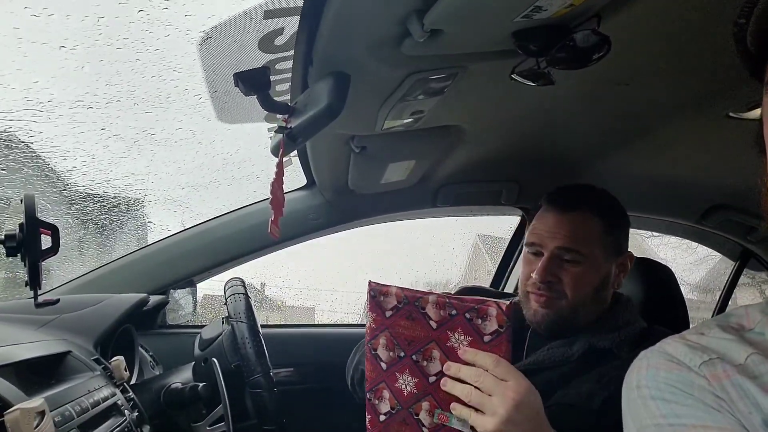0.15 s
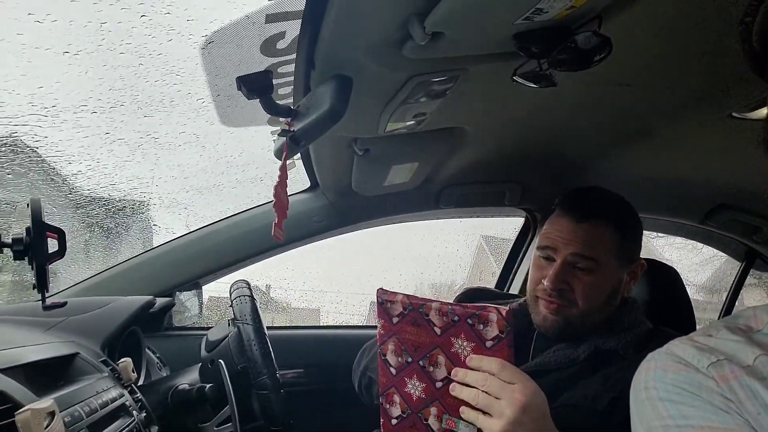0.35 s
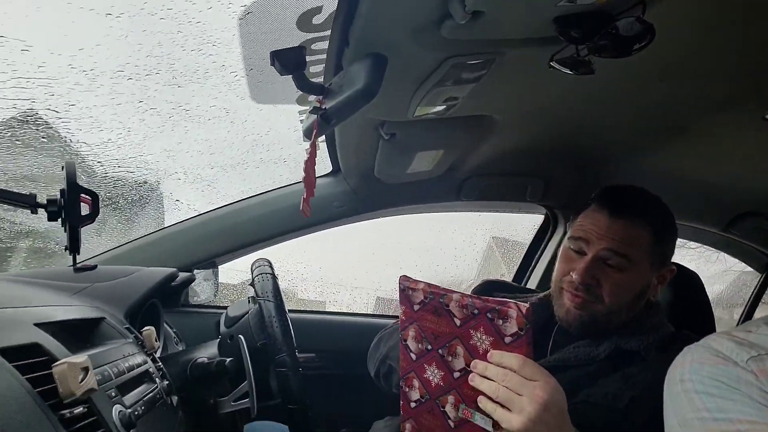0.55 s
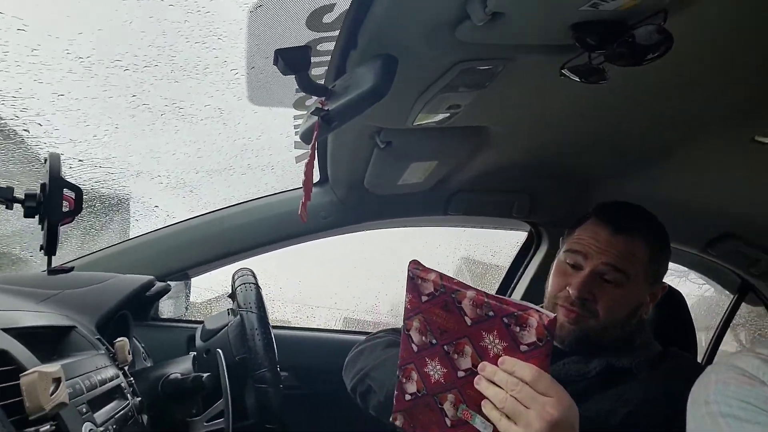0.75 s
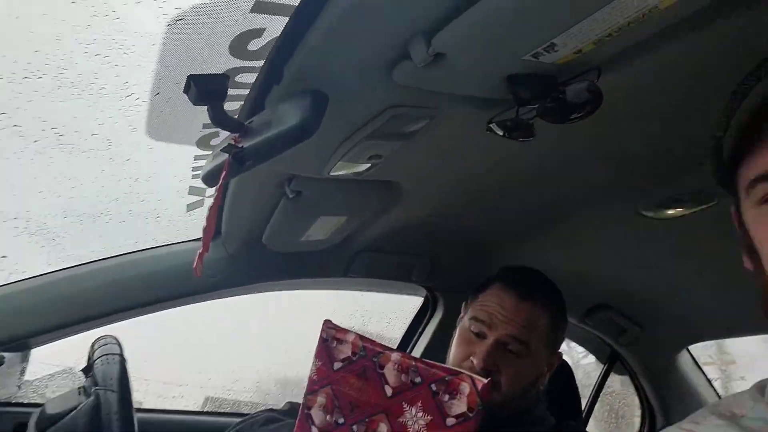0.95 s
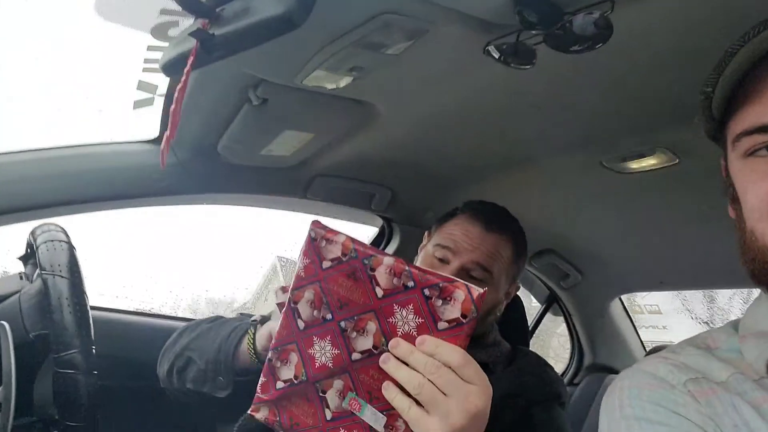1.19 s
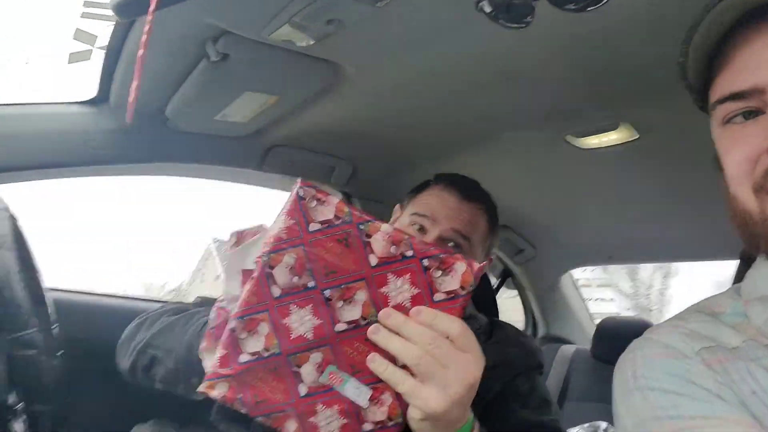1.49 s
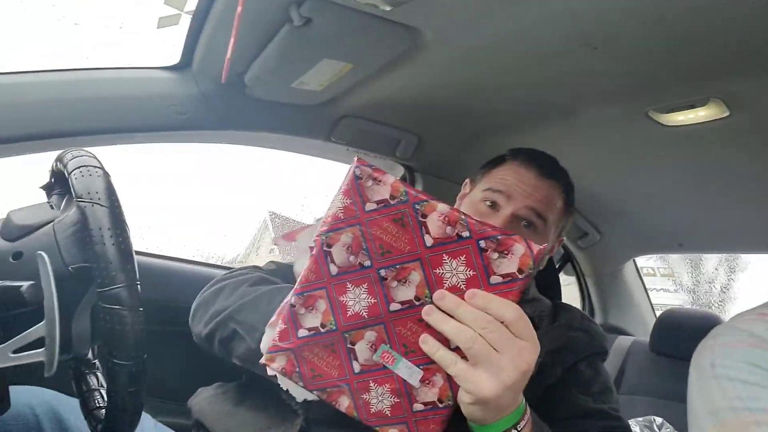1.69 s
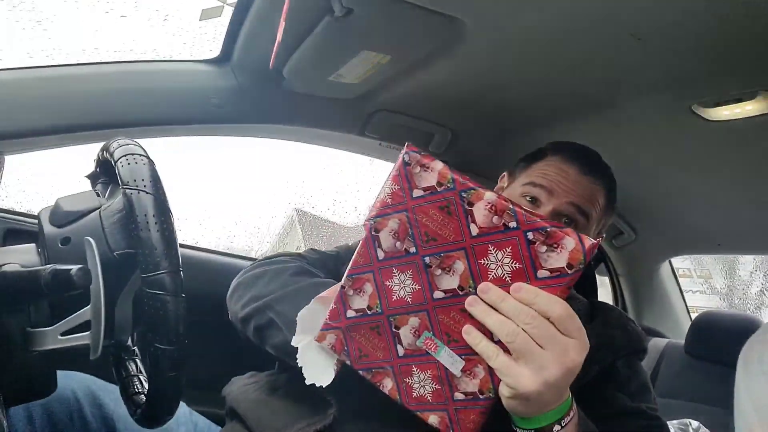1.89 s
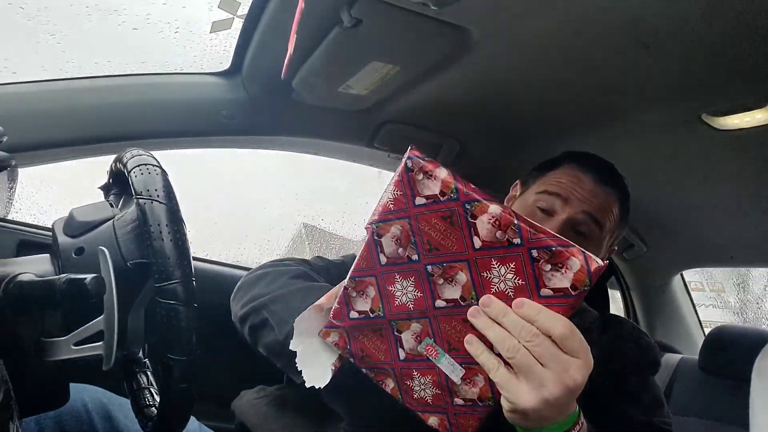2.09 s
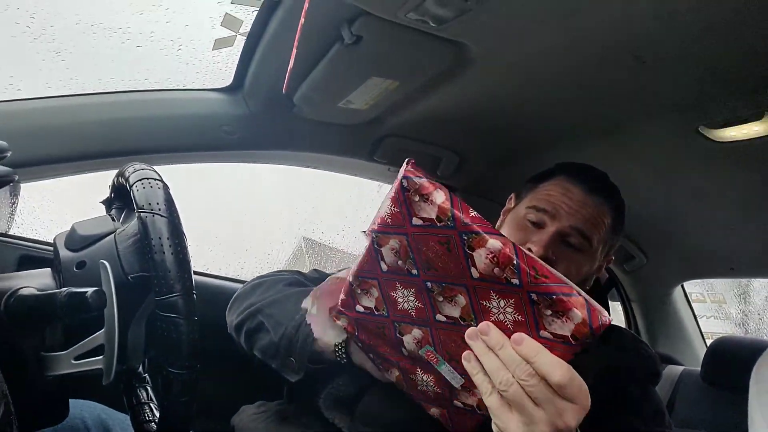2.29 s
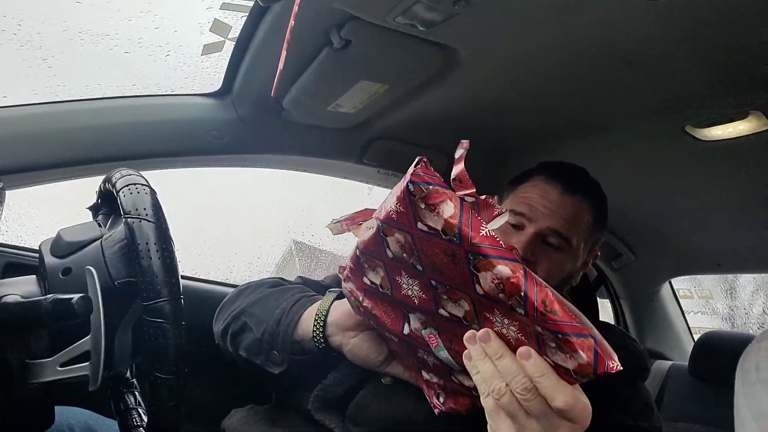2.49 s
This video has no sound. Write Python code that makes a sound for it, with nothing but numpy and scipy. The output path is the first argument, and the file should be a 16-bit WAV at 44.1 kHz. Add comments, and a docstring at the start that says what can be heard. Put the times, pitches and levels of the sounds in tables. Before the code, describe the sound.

Crisp wrapping paper rips and crinkles in quick pulls, with soft box thumps, inside a car.

```python
"""Inside a parked car, gift wrap is torn and crumpled by hand, an arm's length from a phone.
Random fibre snaps, filtered into six bands, make a rustle that swells with each pull and crease.
Lone crackles and popping folds are short decaying sines; bumps on the box are low gliding rings.
The padded cabin adds brief noise tails over a low hum of filtered noise."""
import sys
import numpy as np
from scipy import signal
from scipy.fft import rfft, irfft
from scipy.io import wavfile
from scipy.ndimage import uniform_filter1d

SR = 44100
rng = np.random.default_rng(int(sys.argv[2]) if len(sys.argv) > 2 else 0)


def file_out(sig):
    """Save sig as 16-bit WAV at sys.argv[1]."""
    # one column per channel
    cols = np.atleast_2d(sig).T
    # limit, then scale
    lim = np.clip(cols, -1, 1)
    pcm = np.round(lim * 32767).astype(np.int16)
    wavfile.write(sys.argv[1], SR, pcm)


N = 116865


def undb(db):
    """Amplitude gain from dB."""
    return 10 ** (np.asarray(db) / 20)


def unit(x):
    """Scale to rms 1."""
    return x / np.sqrt(np.mean(x ** 2))


def colour(x, table):
    """Filter by (freq_hz, gain_db) points, interpolated over log frequency."""
    freq_hz, gain_db = np.array(table, float).T
    bin_hz = np.fft.rfftfreq(N, 1 / SR)
    bin_db = np.interp(np.log(bin_hz + 1), np.log(freq_hz + 1), gain_db)
    return irfft(rfft(x) * undb(bin_db), N)


def walk(rate_hz):
    """Random levels, one per 1 / rate_hz, joined by ramps; rms 1."""
    hold = max(int(SR / rate_hz), 2)
    steps = np.repeat(rng.standard_normal(N // 100), hold)[:N]
    return unit(uniform_filter1d(steps, hold))


def gate(t, start_s, end_s, rise_s, fall_s):
    """Linear rise that is full at start_s, hold to end_s, exponential fall."""
    rise = np.clip((t - start_s) / rise_s + 1, 0, 1)
    return rise * np.exp(-np.maximum(t - end_s, 0) / fall_s)


# cabin hum spectrum: freq_hz, gain_db (per Hz)
HUM_SPECTRUM = [(20, -2.5), (65, 11), (134, 1), (189, 3), (292, -24), (400, -13), (520, -25), (880, -120)]
HUM_DB, HUM_WAVER_DB, HUM_WAVER_HZ = -55, 3.5, 9.8


def hum():
    """Low rumble of the cabin: filtered noise whose level wavers slowly."""
    rumble = unit(colour(rng.standard_normal(N), HUM_SPECTRUM))
    return rumble * undb(HUM_DB + HUM_WAVER_DB * walk(HUM_WAVER_HZ))


# light rustle between pulls: time_s, level_db
RUSTLE_LEVEL = [(0, -56.5), (.16, -45), (.3, -46), (.332, -55.5), (0.387, -57), (0.4, -44.5), (.47, -47.5),
                (.484, -56), (.51, -55), (.555, -43.5), (.75, -44), (.84, -44.5), (1.25, -44.5),
                (1.31, -55.5), (1.385, -52.5), (1.55, -45.5), (1.64, -46.5), (2.04, -40), (2.08, -46.5),
                (2.39, -43.5), (2.441, -57.5), (2.55, -53), (2.65, -51.5)]
# band shares as the wrap loosens, rows start and end: one column per band, rel_db
RUSTLE_BANDS_DB = [(-4.5, -16.5, -6.5, -0.5, -2.5, -8.5), (-23, -4, -3, -3, 0, -6)]


def rustle_power(t):
    """Light handling: one level curve, its band shares sliding from start to end."""
    time_s, level_db = np.array(RUSTLE_LEVEL).T
    band_db = np.linspace(*RUSTLE_BANDS_DB, N).T
    return undb(2 * (np.interp(t, time_s, level_db) + band_db))


# buckling creases: onset_s, peak_db, low_rel_db (under 1.8 kHz), treble_rel_db, length_s
CREASES = [(0.081, -25.5, -21, -22, 0.02), (0.229, -20.5, -18.5, -27, 0.018),
           (0.278, -19.5, -23, -24.5, 0.018), (0.301, -24, -37, -22, 0.0074),
           (0.321, -29, -17, -35, 0.0074), (0.344, -35, -7.5, -19, 0.012), (0.399, -29.5, -9, -10, 0.016),
           (0.447, -20, -22, -25, 0.0059), (0.513, -27.5, -14, -17, 0.013),
           (0.592, -13.5, -35, -24.5, 0.08), (0.659, -18, -14, -38, 0.047), (0.732, -23, -9, -41, 0.021),
           (0.821, -21.5, -6, -31, 0.0065), (0.877, -24, -19, -24, 0.0073),
           (0.906, -11.5, -11.5, -18, 0.013), (0.967, -23.5, -16, -26, 0.018),
           (1.005, -24.5, -9.5, -22, 0.02), (1.077, -16.5, -34, -18.5, 0.0067),
           (1.249, -18.5, -18.5, -36, 0.0059), (1.288, -21.5, -19, -31, 0.0084),
           (1.334, -34, -27, -2.5, 0.0064), (1.4, -21.5, -10, -22, 0.01), (1.445, -22.5, -26, -22, 0.031),
           (1.481, -21, -12, -18, 0.0087), (1.661, -22, -11, -30, 0.0048),
           (1.697, -20.5, -10, -20.5, 0.0088), (1.794, -21.5, -19.5, -17, 0.041),
           (1.846, -23.5, -5, -12.5, 0.01), (1.88, -31, -22, -24, 0.0055), (1.958, -32, -12, -40, 0.0066),
           (1.972, -17.5, -12.5, -16.5, 0.0057), (2.018, -21.5, -30, -16, 0.0037),
           (2.092, -24, -22, -14.5, 0.0075), (2.137, -25.5, -19, -24, 0.013), (2.218, -12, -32, -18, 0.013),
           (2.242, -21.5, -40, -4.5, 0.012), (2.257, -5.5, -44, -17, 0.0098),
           (2.31, -7.5, -14.5, -27, 0.0066), (2.497, -29.5, -15, -22, 0.0081),
           (2.571, -27, -22, -16, 0.012), (2.586, -23.5, -46, -20, 0.018)]
# split of a crease's low end over the three lowest bands: rel_db
CREASE_LOW_DB = (-15, -10, -2)
CREST_DB = 15  # peak over rms
CREASE_RISE = .2  # fraction of length


def crease_power(t):
    """Buckling: bursts that rise fast, hold to half their length, then decay."""
    power = 0
    for onset_s, peak_db, low_rel_db, treble_rel_db, length_s in CREASES:
        low_db = [low_rel_db + share_db for share_db in CREASE_LOW_DB]
        rel_db = np.array(low_db + [-CREST_DB, -CREST_DB, treble_rel_db])[:, None]
        rise_s, half_s = CREASE_RISE * length_s, length_s / 2
        envelope = gate(t, onset_s + rise_s, onset_s + half_s, rise_s, half_s)
        power = power + undb(2 * (peak_db + rel_db)) * envelope ** 2
    return power


# pulls that tear the sheet: start_s, end_s, start_db, end_db, then rel_db of
# 250-560 Hz, 560-1080 Hz, 1.08-1.8 kHz, 1.8-3.6 kHz, treble (3.6-8.5 kHz is the reference)
TEARS = [(0.192, 0.26, -41, -35.5, -14.5, -18, -7.5, -1.5, -4.5),
         (0.572, 0.701, -32, -35, -10, -16, -5, -1, -4), (0.865, 0.942, -30, -32, -9.5, -18, -4, -6, -7),
         (0.984, 1.13, -43, -42.5, -35, -14, -2, -1.5, -2.5),
         (1.152, 1.192, -31.5, -36.5, -53, -16, -5.5, -6.5, -7.5),
         (1.416, 1.516, -39, -36.5, -36, -12, -7.5, -4.5, -13),
         (1.677, 1.748, -44.5, -47.5, -10.5, 1, 2, 4, -18),
         (1.772, 1.951, -33, -35, -24, -10, -8, -2.5, -9), (2.135, 2.262, -34, -33, -37, -10, -8, -7, -9),
         (2.24, 2.378, -29, -31, -15, -8, -2.5, -2.5, -7)]
TEAR_RISE_S, TEAR_FALL_S = .014, .006


def tear_power(t):
    """Tearing: each pull ramps in dB between two levels, with its own band balance."""
    power = 0
    for start_s, end_s, start_db, end_db, *low_rel_db, treble_rel_db in TEARS:
        pull_db = np.interp(t, (start_s, end_s), (start_db, end_db))
        level_db = pull_db + np.array([*low_rel_db, 0, treble_rel_db])[:, None]
        envelope = gate(t, start_s, end_s, TEAR_RISE_S, TEAR_FALL_S)
        power = power + (undb(level_db) * envelope) ** 2
    return power


FLUTTER_DB, FLUTTER_HZ = 1.7, 110  # rustle and tears, all bands together
FLICKER_DB = 1.5  # each band alone


def efforts(t):
    """Hand effort as gain per band: rustle, tears and creases add as power."""
    flutter = undb(2 * FLUTTER_DB * walk(FLUTTER_HZ))
    power = (rustle_power(t) + tear_power(t)) * flutter + crease_power(t)
    flicker = undb([FLICKER_DB * walk(FLUTTER_HZ) for _ in power])
    return np.sqrt(power) * flicker


SNAPS_PER_S = 7000


def snaps():
    """Fibres snapping: impulses at random moments and strengths."""
    hit = rng.random(N) < SNAPS_PER_S / SR
    return hit * rng.standard_normal(N)


# colour of paper and microphone: freq_hz, gain_db (per Hz)
PAPER_COLOUR = [(150, 1.5), (282, -22), (500, -16), (620, -18), (850, -17), (1120, -13), (1300, -2.5),
                (1470, -18), (1670, -14), (2400, -7.5), (2760, 1), (3250, -2), (7700, -5), (9660, -15),
                (11900, -7.5), (16000, -9.5)]
# edges of the six bands: edge_hz
EDGES_HZ = (250, 560, 1080, 1800, 3600, 8500, 17000)


def paper(effort):
    """Coloured snaps split into bands, each scaled to rms 1 and driven by its effort."""
    source, out = colour(snaps(), PAPER_COLOUR), 0
    for low_hz, high_hz, gain in zip(EDGES_HZ, EDGES_HZ[1:], effort):
        sos = signal.butter(3, (low_hz, high_hz), "bandpass", fs=SR, output="sos")
        out = out + gain * unit(signal.sosfilt(sos, source))
    return out


CRACKLES_PER_S, CRACKLE_DECAY_CYCLES = 460, 16.6
CRACKLE_DB, CRACKLE_SPREAD_DB = -2, -0.5  # relative to the band's effort


def crackles(effort):
    """Lone crackles: decaying sines at random pitch, cut at 512 samples, scaled by band effort."""
    out, u = np.zeros(N + 512), np.arange(512) / SR
    for when, pitch, size in rng.random((4000, 3))[:int(CRACKLES_PER_S * N / SR)]:
        i = int(when * N)
        pitch_hz = 1100 * 7.5 ** pitch
        band = np.searchsorted(EDGES_HZ, pitch_hz) - 1
        level_db = CRACKLE_DB - CRACKLE_SPREAD_DB * np.log(0.097 + size)
        decay = np.exp(-u * pitch_hz / CRACKLE_DECAY_CYCLES)
        out[i:i + 512] += effort[band, i] * undb(level_db) * np.sin(2 * np.pi * pitch_hz * u) * decay
    return out[:N]


GLIDE_S = 0.084  # time constant


def ring(start_s, level_db, start_hz, end_hz, t60_s):
    """Damped sine that swells within half a cycle and glides to its resting pitch."""
    t = np.maximum(np.arange(N) / SR - start_s, 0)
    turns = end_hz * t + (start_hz - end_hz) * GLIDE_S * (1 - np.exp(-t / GLIDE_S))
    swell = np.minimum(2 * turns, 1)
    return -undb(level_db - 60 * t / t60_s) * swell * np.sin(2 * np.pi * turns)


# folds popping loose: start_s, level_db, pitch_hz
POPS = [(0.285, -21.5, 1270), (.9851, -21.5, 3210), (1.048, -24, 3040), (1.303, -27.5, 1050),
        (1.405, -28, 920), (1.483, -22.5, 1130), (1.7664, -45, 4500), (1.97, -18.5, 895), (2.048, -26, 730),
        (2.217, -15, 880), (2.3268, -9, 1150), (2.456, -33.5, 1290), (2.501, -31, 790), (2.606, -32.5, 686)]
POP_T60_S = .014


def pops():
    """Folds popping loose: short rings at fixed pitch."""
    return sum(ring(start_s, level_db, hz, hz, POP_T60_S) for start_s, level_db, hz in POPS)


# bumps on the box: start_s, level_db, start_hz, end_hz, t60_s
BUMPS = [(0.734, -20, 104, 60, 0.12), (0.754, -19, 79, 60, 0.15), (0.789, -28, 44.7, 43.7, 0.38),
         (0.834, -26, 46.7, 45.6, 0.15), (0.921, -34, 75, 57, 0.23), (1.009, -31.5, 195, 175, 0.072),
         (1.023, -34, 76, 65.6, 0.14), (1.443, -40, 85, 70, 0.34), (1.683, -40.5, 71.8, 57, 0.71),
         (2.299, -33, 176, 149, 0.18), (2.343, -22.5, 174, 109, 0.056), (2.374, -26.5, 91, 70, 0.066)]


def bumps():
    """The bumped box: low rings that glide down as they decay."""
    return sum(ring(*row) for row in BUMPS)


CABIN_T60_S, CABIN_DB = .035, -5
MOVE_S = .07  # interval between new reflection patterns


def cabin(x):
    """Reflections off glass and seats: short noise tails, crossfaded as the sheet moves."""
    hop, u = int(MOVE_S * SR), np.arange(4000) / SR
    out = np.zeros(N + 4 * hop + len(u))
    x = np.pad(x, (hop, 2 * hop))
    fade = np.sin(np.pi * np.arange(2 * hop) / 2 / hop)
    for i in range(0, N + hop, hop):
        tail = rng.standard_normal(len(u)) * undb(-60 * u / CABIN_T60_S)
        tail = tail / np.sqrt(np.sum(tail ** 2))  # unit energy
        piece = signal.fftconvolve(x[i:i + 2 * hop] * fade, tail)
        out[i:i + len(piece)] += piece
    return out[hop:hop + N]


# colour of the side signal: freq_hz, gain_db
SIDE_COLOUR = [(60, -19), (200, -17), (380, -10.5), (700, -4.5), (2380, -2), (4400, 0), (8120, -3),
               (15000, -8.5)]
# the parcel drifts right, from the left towards the middle: time_s, left_minus_right_db
PAN = [(0, 3), (2.3, 0), (2.65, 0.5)]


def scene():
    """Direct sound in mid, reflections and hum in mid and side, then a slow pan."""
    t = np.arange(N) / SR
    effort = efforts(t)
    wrap = paper(effort) + crackles(effort) + pops()
    box = bumps()
    cabin_gain = undb(CABIN_DB)
    wrap_in_cabin = (wrap + cabin_gain * cabin(wrap)) / np.hypot(1, cabin_gain)
    mid = wrap_in_cabin + box + hum()
    side = colour(cabin(wrap + box) + hum(), SIDE_COLOUR)
    pan_db = np.interp(t, *np.array(PAN).T)
    return np.array([mid + side, mid - side]) * undb(np.array([pan_db, -pan_db]) / 2)


TOP_HZ = 15900


def record(dry):
    """The phone cuts the top: steep elliptic low-pass."""
    sos = signal.ellip(10, .2, 80, TOP_HZ, fs=SR, output="sos")
    return signal.sosfilt(sos, dry)


dry = scene()
out = record(dry)
file_out(out)
```